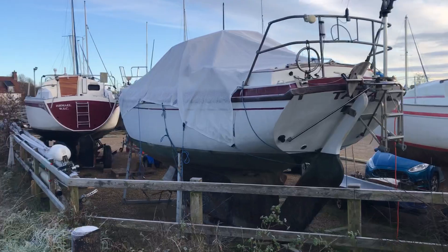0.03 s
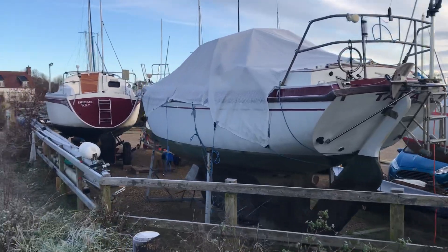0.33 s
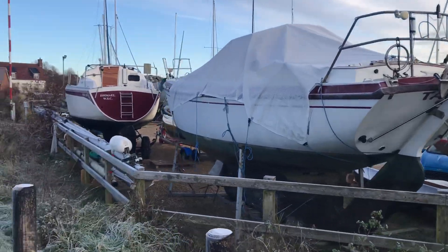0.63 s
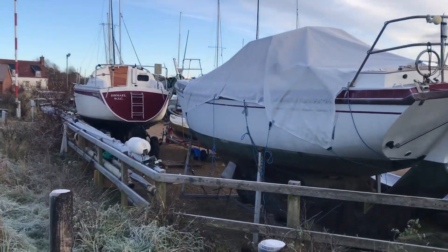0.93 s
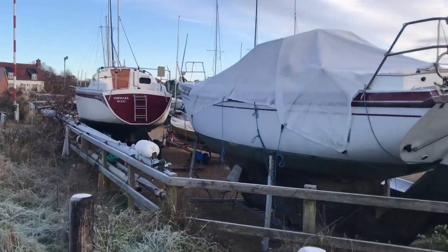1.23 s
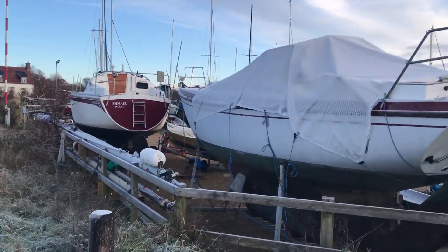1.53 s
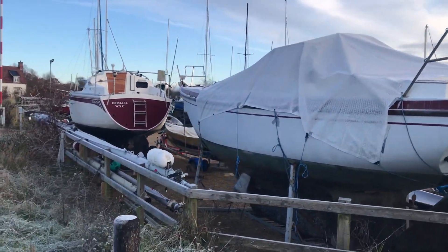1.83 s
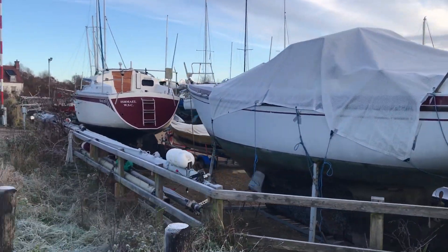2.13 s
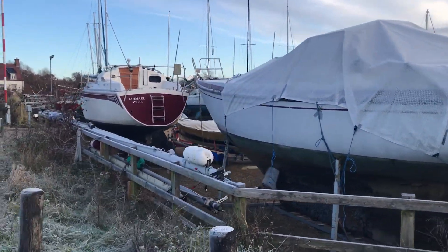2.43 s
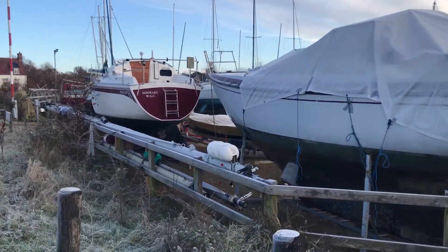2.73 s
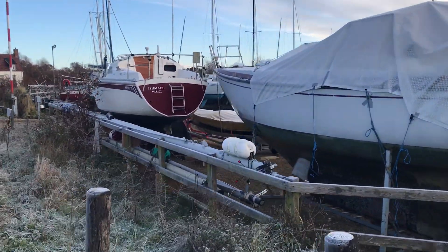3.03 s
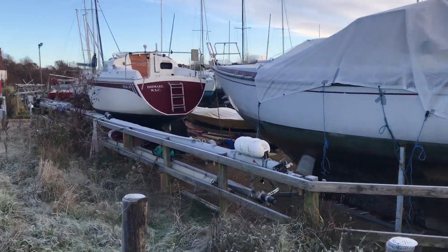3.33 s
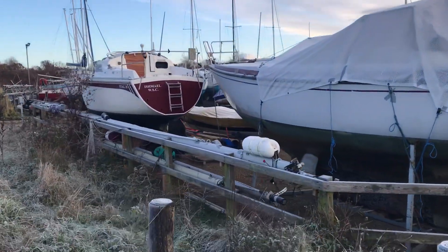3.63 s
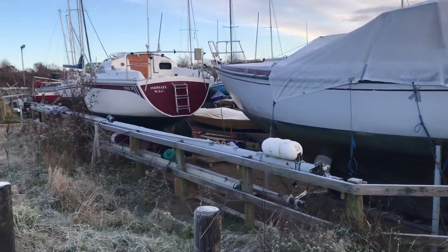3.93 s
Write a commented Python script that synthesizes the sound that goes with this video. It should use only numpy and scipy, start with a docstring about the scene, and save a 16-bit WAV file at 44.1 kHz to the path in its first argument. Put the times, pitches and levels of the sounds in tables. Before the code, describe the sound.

Outdoors among stored boats, a distant diesel engine clatters at idle and gradually softens. Low wind thumps the microphone for a second, followed by one brittle crunch underfoot, a brief soft drone, and small snaps of frosty grass nearby.

```python
"""Wind buffets the microphone for the first second, over a six-cylinder diesel idling some way off
in a frosty boatyard: each firing rattles the block, and one cylinder knocks. Someone shifts their
feet in frozen grass: stems tick, blades scuff, and something brittle crunches underfoot. Midway a
soft low drone swells and a jacket sleeve swishes and squeaks. Under it all lies a bed of far
rumble, faint hiss and frost crackle."""
import sys
import numpy as np
from scipy import signal
from scipy.fft import rfft, irfft, next_fast_len
from scipy.io import wavfile
from scipy.ndimage import uniform_filter1d, map_coordinates

SR = 44100
rng = np.random.default_rng(int(sys.argv[2]) if len(sys.argv) > 2 else 0)


def bounce(signal):
    """Save signal as a 16-bit WAV file at the path given by the first command-line argument."""
    frames = np.transpose(np.atleast_2d(signal))
    limited = np.clip(frames, -1, 1)
    pcm = np.round(limited * 32767).astype(np.int16)
    wavfile.write(sys.argv[1], SR, pcm)


N = 176400

# the breeze on the microphone (time [s], level [dB])
WIND_LEVEL = [(0, -40), (.24, -47.5), (.35, -39), (.9, -40), (1.05, -42), (1.18, -53.5), (2, -66)]
# single buffets on top of it (peak time [s], level [dB], half length [s])
WIND_BUFFETS = [(0.031, -30.5, 0.0089), (0.293, -23, .014), (0.327, -30, 0.017), (0.437, -29, 0.012),
                (0.619, -32.5, .025), (0.68, -28, 0.0166), (0.795, -31.5, 0.035), (0.852, -32.5, 0.022)]
# colour of the turbulence (frequency [Hz], density [dB])
WIND_COLOUR = [(15, -33), (30, 3), (42, -2.5), (65, 3), (100, -0.5), (150, -9.5), (220, -29), (350, -31.5),
               (800, -74)]

# faders for the engine (time [s], clatter level [dB], treble level [dB])
ENGINE_LEVELS = [(0, -51, -56.5), (.4, -52, -61), (.9, -52, -66), (1.4, -54, -65), (1.9, -55.5, -62.5),
                 (2.4, -58.5, -60.5), (3.2, -60, -65), (4, -58.5, -66.5)]
# body of the clatter (frequency [Hz], density [dB])
CLATTER_COLOUR = [(150, -17), (300, -4.5), (500, -5.5), (750, 2), (1100, 2.5), (1450, 1), (1650, -8.5),
                  (2300, -20.5), (3400, -30.5), (8000, -40.5)]
# bright edge of the clatter (frequency [Hz], density [dB])
TREBLE_COLOUR = [(800, -21), (1800, 5.5), (2300, 0), (2750, 0.5), (3300, -6.5), (4400, -7.5), (5200, -29),
                 (9000, -25)]
# exhaust and gear tones (multiple of the firing rate, level against the clatter [dB])
HUM_TONES = [(1, -4), (2, -13.5), (3, -8), (11, -15.5), (22, -11)]
# casing modes that the knock rings (frequency [Hz], relative level [dB])
KNOCK_MODES = [(1295, 0), (1373, -4)]
# fader for the knock (time [s], gain against the clatter [dB])
KNOCK_GAIN = [(0, 6), (1.6, 3.5), (2.2, -2), (2.8, 1.5), (4, 2.5)]
CYLINDERS, CYCLE_S, FIRST_KNOCK_S = 6, .0897, .0445
CLATTER_T60_S, CLATTER_REPEAT_SHARE, HUM_WAVER_DB = 0.23, 0.77, 2
KNOCK_RISE_S, KNOCK_FALL_S, KNOCK_SCATTER_DB, KNOCK_DETUNE = 0.0058, 0.0065, 1.5, .03

# fader for the far rumble (time [s], level [dB])
FAR_RUMBLE_LEVEL = [(0, -46.5), (1.2, -53), (1.65, -51), (2, -50.5), (2.5, -49), (2.8, -50.5), (3.1, -50),
                    (4, -48.5)]
# colour of the far rumble (frequency [Hz], density [dB])
FAR_RUMBLE_COLOUR = [(15, -6), (30, -16), (45, 0.5), (70, 2.5), (95, -1), (125, -1), (160, -3.5),
                     (230, -6.5), (350, -14.5), (600, -17.5), (2000, -50.5)]
# colour of the open-air hiss (frequency [Hz], density [dB])
AIR_COLOUR = [(100, 17), (1500, 22.5), (4000, 6), (6000, 10), (8000, 1), (16000, -0.5)]
AIR_DB = -65

# frozen stems ticking (time [s], peak level [dB], low cut [Hz], high cut [Hz])
STEM_TICKS = [(.1155, -41, 5000, 16000), (.3265, -38, 5000, 14000), (0.395, -28, 2490, 19800),
              (0.681, -41, 6500, 13000), (.696, -25.5, 3680, 9700), (.704, -32, 6000, 11200),
              (.714, -35, 5000, 9500), (.721, -38, 5000, 9500), (0.7608, -38, 7000, 18000),
              (1.541, -39.5, 3480, 12000), (1.8383, -43.5, 6500, 12000), (2.5435, -41, 5000, 16000),
              (3.067, -51, 10000, 16000), (3.218, -25.5, 1650, 18000), (3.368, -39.5, 3000, 18000)]
# colour of a stem's tick (frequency [Hz], density [dB])
TICK_COLOUR = [(500, -11), (1700, 9), (3000, -1), (4500, -15), (6000, -9), (8000, -6.5), (10500, -9),
               (16000, -12)]
CRACKLE_PER_S, CRACKLE_DRIVE_DB, CRACKLE_SPREAD_DB = 25, -58, 14
# scuffs through the grass (peak time [s], level [dB], rise [s], fall [s], bright tilt [dB])
GRASS_SCUFFS = [(.12, -59, 0.042, 0.043, -2.5), (.34, -58.5, 0.043, 0.17, -3),
                (.602, -54.5, 0.012, 0.019, 2), (.702, -61.5, 0.031, 0.059, 2),
                (1.301, -45.5, 0.015, 0.034, 1), (2.56, -66, 0.011, 0.13, -3),
                (3.133, -51, 0.0067, 0.019, 5.5), (3.689, -46, 0.003, 0.013, 7.5),
                (3.744, -62, 0.018, 0.09, -5.5), (3.91, -62, 0.019, 0.039, -0.5)]
# colour of rubbing grass and cloth (frequency [Hz], density [dB])
RUSTLE_COLOUR = [(300, -5), (1500, 13.5), (4000, 5), (6000, 3), (8500, 2), (10500, 4.5), (12500, 2),
                 (16000, 0.5)]
# brittle cracks underfoot (time [s], peak level [dB], low cut [Hz], high cut [Hz])
FOOT_CRACKS = [(1.2612, -31, 900, 6000), (1.2835, -36, 1700, 12000), (1.2863, -26.5, 1700, 10000),
               (1.2916, -28, 900, 12000), (1.2971, -19, 553, 16000), (1.3004, -28, 900, 11000),
               (1.3023, -33, 1300, 4000), (1.3133, -25.5, 810, 6040), (1.3145, -32.5, 350, 1090),
               (1.318, -34, 250, 4000), (2.0471, -32.5, 1320, 3140)]
# colour of a crack (frequency [Hz], density [dB])
CRACK_COLOUR = [(350, 9), (750, 10), (1250, -1), (1700, 1.5), (2100, -6.5), (2750, 1.5), (3400, -6.5),
                (4200, -11), (5000, -18), (16000, -21)]

# swell and fade of the low drone (time [s], level [dB])
DRONE_SWELL = [(1.5, -85), (1.85, -52.5), (2.1, -49), (2.35, -60.5), (2.55, -86)]
# colour of the drone (frequency [Hz], density [dB])
DRONE_COLOUR = [(70, -38), (120, 0), (150, 11), (195, -2.5), (250, -7.5), (500, -43.5)]

# the sleeve's stroke (time [s], level [dB])
SLEEVE_LEVEL = [(1.8, -82), (1.95, -60.5), (2, -61.5), (2.05, -57.5), (2.09, -57.5), (2.16, -63),
                (2.19, -57.5), (2.26, -65), (2.6, -105)]
# squeaks of the cloth
# (peak time [s], level [dB], half length [s], pitch [Hz], glide [octaves/s], roughness [0-1])
CLOTH_SQUEAKS = [(1.89, -77, 0.018, 13500, 0, .15), (1.969, -57, .009, 3800, 2, 0.2),
                 (1.98, -64, 0.017, 7800, 6, .7), (2.078, -56.5, .009, 4580, -10, 1),
                 (2.104, -61, 0.0073, 5100, -18, .5), (2.16, -63, 0.017, 4550, -6.5, .7),
                 (2.184, -58, 0.0079, 5230, -3, .3), (3.934, -65, .018, 6040, 1, .7)]
SQUEAK_FLUTTER_PER_S = 1100

# the microphone's dip in the treble (frequency [Hz], gain [dB])
MICROPHONE_EQ = [(9600, 0), (10500, -4.5), (11700, 0)]
BAND_LIMIT_HZ = 15900


def amp(db):
    return 10 ** (np.asarray(db) / 20)


def unit(x):
    return x / np.sqrt(np.mean(x ** 2) + 1e-20)


def clock():
    return np.arange(N) / SR


def faders(rows):
    """One value per sample for each column after the time."""
    times, *columns = np.transpose(rows)
    return [np.interp(clock(), times, column) for column in columns]


def wobble(rate):
    """A smooth random curve, rate knots a second."""
    return map_coordinates(rng.standard_normal(int(N * rate / SR) + 4), [clock() * rate])


def coloured(x, colour):
    """x through a minimum-phase EQ drawn by (frequency [Hz], gain [dB]) points."""
    size = 2 * next_fast_len(len(x))
    hz, db = np.transpose(colour)
    gain = amp(np.interp(np.log(np.fft.rfftfreq(size, 1 / SR) + 1), np.log(hz + 1), db))
    cepstrum = irfft(np.log(gain))
    cepstrum[1:size // 2] *= 2  # folded forward, so nothing rings ahead of an attack
    cepstrum[size // 2 + 1:] = 0
    return irfft(rfft(x, size) * np.exp(rfft(cepstrum)))[:len(x)]


def thinned(colour, low_hz, high_hz=SR):
    """A colour with less weight below low_hz and above high_hz."""
    return [(hz, db - 20 * np.log10(1 + (low_hz / hz) ** 3 + (hz / high_hz) ** 6)) for hz, db in colour]


def noise(colour):
    """Coloured noise of rms 1."""
    return unit(coloured(rng.standard_normal(N), colour))


def swell(t, rise, fall):
    """A soft rise to t = 0, then an exponential fall."""
    return np.exp(-(np.minimum(t, 0) / rise) ** 2 - np.maximum(t, 0) / fall)


def add(track, s, sound):
    """Mix a sound in at s seconds."""
    part = track[round(s * SR):][:len(sound)]
    part += sound[:len(part)]


def eddies(window_s=.02):
    """Low turbulence ridden to an even level, ready to be shaped into buffets."""
    turbulence = noise(WIND_COLOUR)
    size = round(window_s * SR)
    power = uniform_filter1d(uniform_filter1d(turbulence ** 2, size), size // 2)
    return unit(turbulence / np.sqrt(np.abs(power) + 1e-20))


def wind():
    """Eddies push on the microphone: a breeze with short buffets on top."""
    power = amp(faders(WIND_LEVEL)[0]) ** 2
    for s, db, half_s in WIND_BUFFETS:
        power += (amp(db) * np.exp(-((clock() - s) / half_s) ** 2)) ** 2
    low_cut = signal.butter(3, 34, "highpass", fs=SR, output="sos")
    return signal.sosfiltfilt(low_cut, np.sqrt(power) * eddies())


def rattle(firings, colour):
    """The block's rattle: noise pulsed by the firings, partly alike in every cycle."""
    looped = np.resize(rng.standard_normal(round(CYCLE_S * SR)), N)
    fresh = rng.standard_normal(N)
    shake = np.sqrt(CLATTER_REPEAT_SHARE) * looped + np.sqrt(1 - CLATTER_REPEAT_SHARE) * fresh
    return unit(coloured(shake * firings, colour))


def hum(firing_count):
    """Exhaust and gears hum at multiples of the firing rate, wavering in level and phase."""
    out = np.zeros(N)
    for multiple, db in HUM_TONES:
        peak = np.sqrt(2) * amp(db + HUM_WAVER_DB * wobble(5.73))
        phase = 2 * np.pi * (multiple * firing_count + rng.random())
        out += peak * np.sin(phase + 0.93 * wobble(5.05))
    return out


def engine():
    """The idling diesel: every firing kicks off a clatter, with the hum and the knock mixed in."""
    t, firing_s = clock() - FIRST_KNOCK_S, CYCLE_S / CYLINDERS
    clatter_db, treble_db = faders(ENGINE_LEVELS)
    knock_db, = faders(KNOCK_GAIN)
    firings = amp(-60 * (t % firing_s) / CLATTER_T60_S)
    clatter = rattle(firings, CLATTER_COLOUR)
    treble = rattle(firings, TREBLE_COLOUR)
    body = clatter + hum(t / firing_s) + amp(knock_db) * knocks()
    return amp(clatter_db) * body + amp(treble_db) * treble


def knocks():
    """One cylinder rings the casing once every cycle, never quite alike."""
    out, t = np.zeros(N), np.arange(SR // 16) / SR
    envelope = swell(t - KNOCK_RISE_S, KNOCK_RISE_S / 2, KNOCK_FALL_S)
    for s in np.arange(FIRST_KNOCK_S, N / SR, CYCLE_S):
        for hz, db in KNOCK_MODES:
            strength = amp(db + KNOCK_SCATTER_DB * rng.normal())
            pitch = hz * (1 + KNOCK_DETUNE * rng.normal())
            add(out, s, strength * envelope * np.sin(2 * np.pi * (pitch * t + rng.random())))
    return out


def rumble():
    """A far, low bed of noise whose level wavers slightly."""
    level_db, = faders(FAR_RUMBLE_LEVEL)
    return amp(level_db + wobble(8.13)) * noise(FAR_RUMBLE_COLOUR)


def air():
    """The faint, steady hiss of the outdoors."""
    return amp(AIR_DB) * noise(AIR_COLOUR)


def frost():
    """Bent stems settle in tiny random ticks."""
    onsets = rng.random(N) < CRACKLE_PER_S / SR
    clicks = onsets * amp(CRACKLE_DRIVE_DB - CRACKLE_SPREAD_DB * rng.random(N))
    return coloured(clicks, thinned(TICK_COLOUR, low_hz=4000))


def snaps(cues, colour, t60_s, tail_gain):
    """One fracture per cue: a sudden click with a short rough tail."""
    out, t = np.zeros(N), np.arange(SR // 10) / SR
    for s, db, low_hz, high_hz in cues:
        push = tail_gain * rng.standard_normal(len(t)) * amp(-60 * t / t60_s)
        push[0] = 1  # the click
        snap = coloured(push, thinned(colour, low_hz, high_hz))
        add(out, s, amp(db) * snap / np.abs(snap).max())
    return out


def ticks():
    """Frozen stems snap, thin and bright."""
    return snaps(STEM_TICKS, TICK_COLOUR, t60_s=0.053, tail_gain=0.019)


def rustle(grain_db, grains_per_s):
    """Rubbing noise of rms 1, grainy as it catches and slips."""
    friction = rng.standard_normal(N) * amp(grain_db * wobble(grains_per_s))
    return unit(coloured(friction, RUSTLE_COLOUR))


def scuffs():
    """Feet brush through the grass in short strokes, each tilted darker or brighter."""
    out = np.zeros(N)
    grains = rustle(grain_db=3.5, grains_per_s=810)
    body = signal.sosfiltfilt(signal.butter(1, 7000, fs=SR, output="sos"), grains)
    sizzle = grains - body
    for s, db, rise, fall, tilt_db in GRASS_SCUFFS:
        tilted = amp(-tilt_db) * body + amp(tilt_db) * sizzle
        out += amp(db) * swell(clock() - s, rise, fall) * tilted
    return out


def crunch():
    """Something brittle gives underfoot: a tight cluster of duller cracks, and one more later."""
    return snaps(FOOT_CRACKS, CRACK_COLOUR, t60_s=0.039, tail_gain=0.046)


def drone():
    """A soft, low band of noise swells and fades."""
    level_db, = faders(DRONE_SWELL)
    return amp(level_db) * noise(DRONE_COLOUR)


def sleeve():
    """Cloth rustles, and its weave gives short squeaks, some clean and some rough."""
    level_db, = faders(SLEEVE_LEVEL)
    out = amp(level_db) * rustle(grain_db=2, grains_per_s=500)
    flutter = wobble(SQUEAK_FLUTTER_PER_S) + 1j * wobble(SQUEAK_FLUTTER_PER_S)
    for s, db, half_s, hz, glide, roughness in CLOTH_SQUEAKS:
        t = clock() - s
        pitch = hz * 2 ** (glide * np.clip(t, -2 * half_s, 2 * half_s))
        tone = np.exp(2j * np.pi * np.cumsum(pitch) / SR)
        grip = np.sqrt(2 * (1 - roughness)) + np.sqrt(roughness) * flutter  # smears tone into rasp
        out += amp(db) * np.exp(-(t / half_s) ** 2) * np.real(grip * tone)
    return out


def scene():
    """The mono mix: the boatyard behind, grass and cloth in front."""
    boatyard = engine() + rumble() + drone() + wind() + air()
    foley = crunch() + ticks() + scuffs() + frost() + sleeve()
    return (boatyard + foley)[None]


def record(dry):
    """The microphone dips the treble, and everything above the band limit is cut."""
    size = next_fast_len(N + SR // 2)
    heard = coloured(dry[0], MICROPHONE_EQ)[None]
    passband = np.fft.rfftfreq(size, 1 / SR) < BAND_LIMIT_HZ
    return irfft(rfft(heard, size) * passband, size)[..., :N]


dry = scene()
out = record(dry)
bounce(out)
```